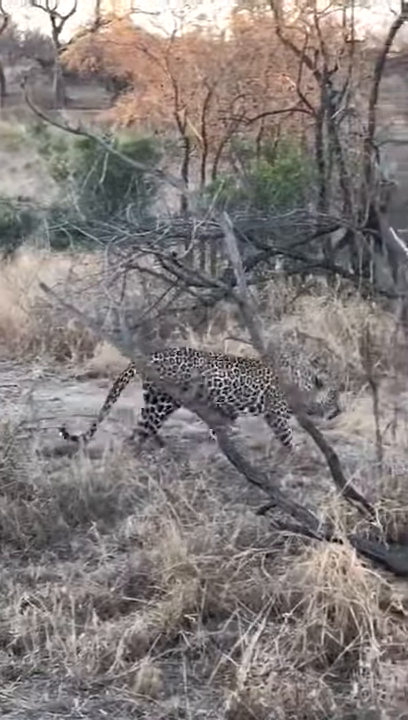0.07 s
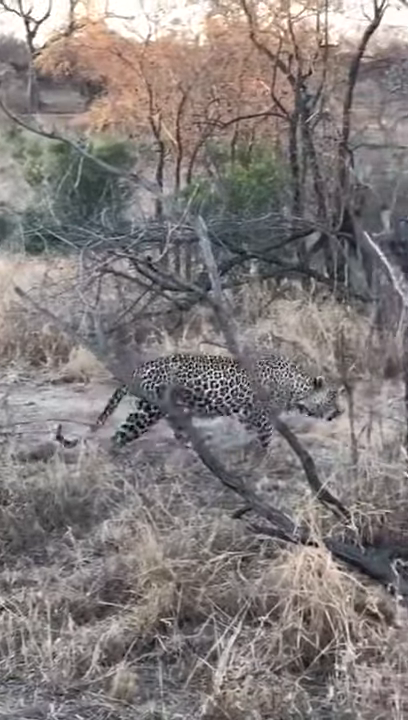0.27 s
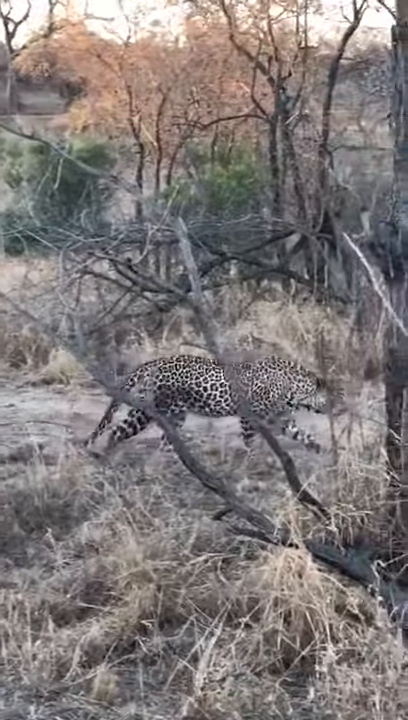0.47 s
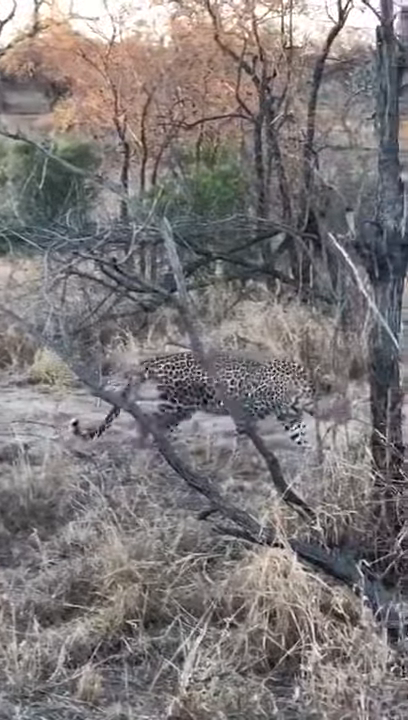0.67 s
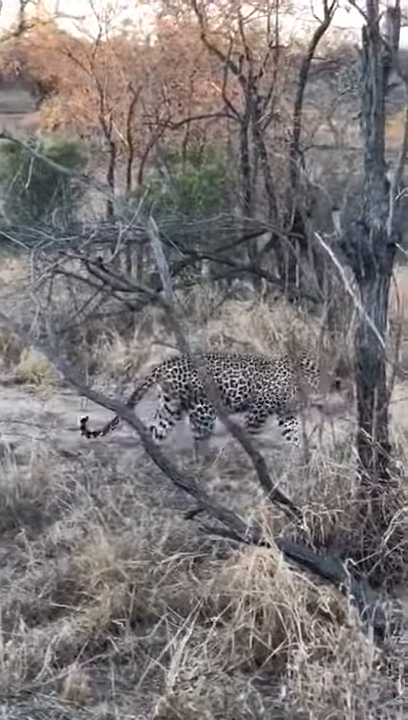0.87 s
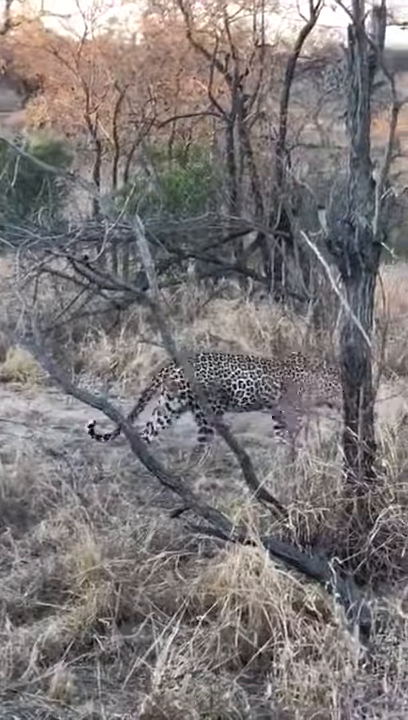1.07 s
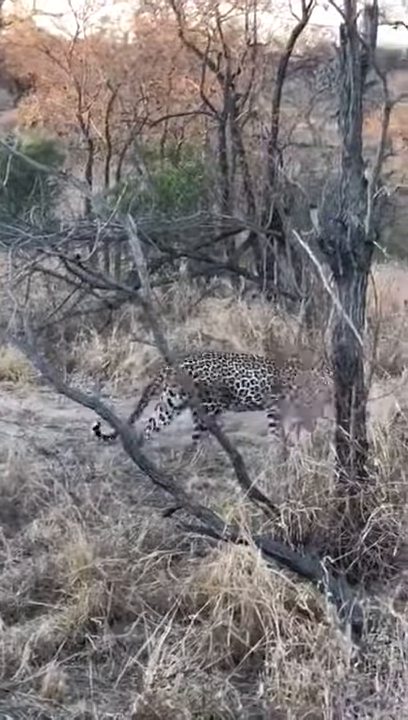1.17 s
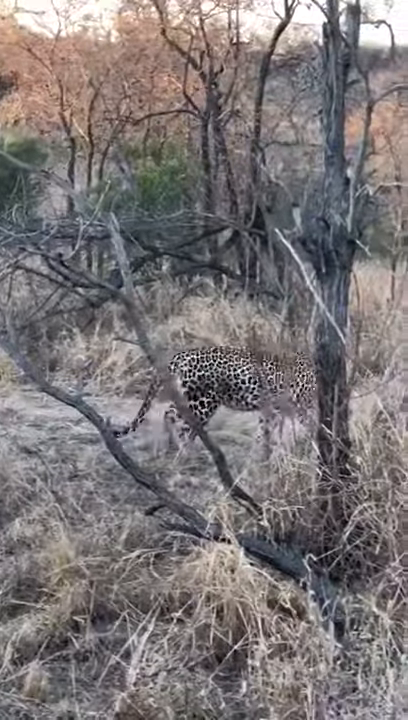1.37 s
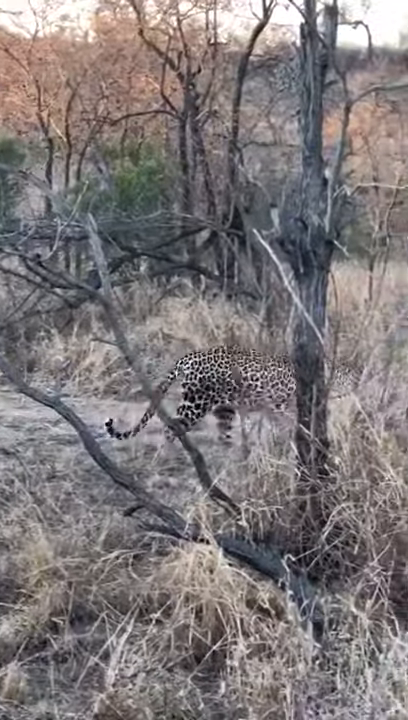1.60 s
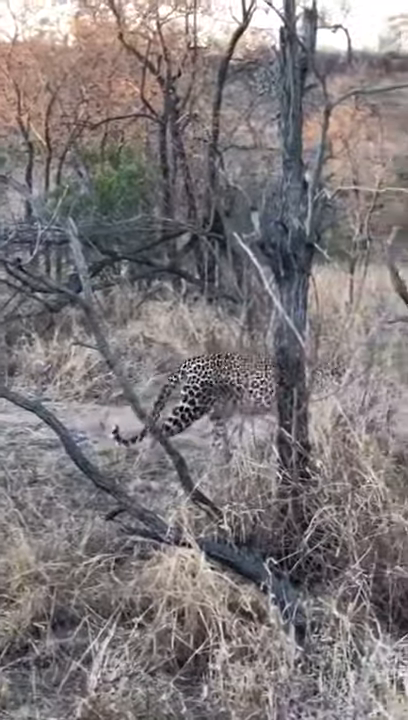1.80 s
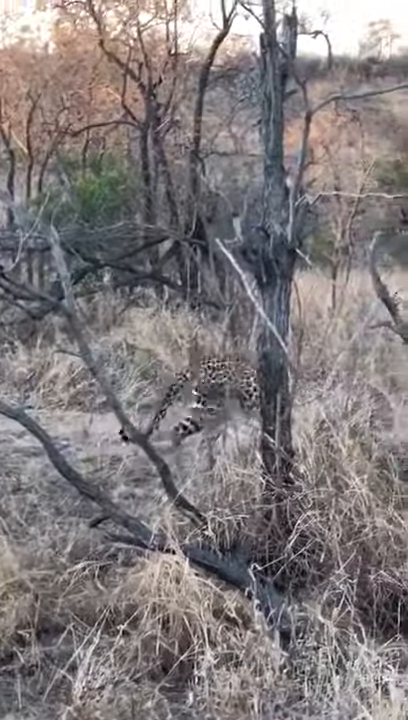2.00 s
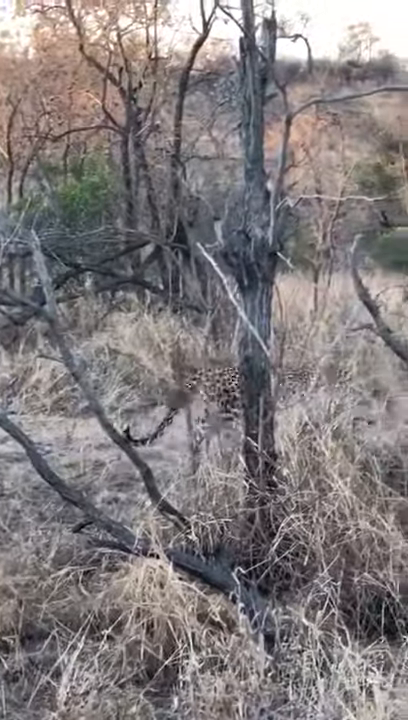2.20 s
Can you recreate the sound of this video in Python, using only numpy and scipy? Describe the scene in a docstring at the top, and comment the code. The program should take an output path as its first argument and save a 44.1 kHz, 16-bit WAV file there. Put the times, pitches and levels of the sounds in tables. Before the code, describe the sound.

A leopard makes a rough sawing call in open bush. Three loud, deep, rattling grunts come at about 0.5, 1.2 and 1.8 seconds, each sinking in pitch, the second a little duller. A quieter hoarse inward rasp precedes each, near 0.3, 0.9 and 1.6 seconds. Soft gulps and wet mouth ticks fall in and between them. A faint distant rumble and thin crackling hiss lie underneath.

```python
"""A leopard saws as it walks through dry bush: three loud outward grunts, each after a hoarse inward rasp.
Its slack vocal folds slap about forty times a second, then slow down; every slap chops a deep, sinking
groan, rings the mouth and lets out a puff of air. Soft gulps and wet mouth ticks come in and between
strokes. Scrub scatters a dull tail, over a faint far rumble and a thin, crackling hiss."""
import sys
import numpy as np
from scipy import signal
from scipy.fft import rfft, irfft
from scipy.io import wavfile
from scipy.ndimage import uniform_filter1d

SR = 44100
rng = np.random.default_rng(int(sys.argv[2]) if len(sys.argv) > 2 else 0)


def store_wav(level_fs):
    """Save 16-bit WAV to argv[1]."""
    pcm = np.round(np.clip(np.atleast_2d(level_fs), -1, 1) * 32767)
    wavfile.write(sys.argv[1], SR, pcm.T.astype(np.int16))


N = 99225
TIME_S = np.arange(N) / SR

# Outward grunts. Each row: time of fastest slapping in seconds, base slap gap in seconds, slowing in
# seconds per slap cubed, groan pitch at that time in Hz, tract frequency scale, treble in dB.
GRUNT_STROKES = [(.4845, .022, .00023, 180.4, 1.0, 1), (1.147, .0226, .00022, 178.3, .98, -12.5),
                 (1.846, .024, .00018, 176.9, 1.025, 0)]
# Push and air flow, one curve per grunt. Each point: time in seconds, relative level in dB.
GRUNT_PUSH = [
    [(.39, -13), (.41, -7), (.455, -9.5), (.492, 3), (.55, -4.5), (.64, -10.5), (.69, -30), (.712, -47)],
    [(1.035, -13.5), (1.075, -6), (1.14, -0.5), (1.21, 0), (1.29, -13), (1.335, -28.5), (1.38, -75)],
    [(1.75, -14), (1.772, -16), (1.835, 0), (1.93, -3.5), (2.0, -14.5), (2.05, -25.5), (2.125, -54)],
]
GRUNT_AIR = [
    [(.385, -37), (.41, -8), (.445, -12.5), (.49, 2.5), (.555, -1.5), (.63, -11), (.72, -35)],
    [(1.03, -16.5), (1.065, -4.5), (1.14, -1), (1.2, 3), (1.25, -4.5), (1.3, -9.5), (1.37, -57)],
    [(1.75, -23), (1.77, -8), (1.82, -1.5), (1.88, -1), (1.95, -5), (2.01, -16.5), (2.11, -51)],
]
# Fold flutter and air flow, one curve per rasp. Each point: time in seconds, relative level in dB.
RASP_FLUTTER = [
    [(0.19, -55), (0.202, -42), (0.22, -28.5), (0.326, -29.5), (0.378, -52), (0.385, -60)],
    [(0.8, -43.5), (0.864, -36), (0.878, -29), (0.94, -29.5), (0.974, -33), (1.03, -59)],
    [(1.505, -79), (1.521, -35.5), (1.617, -30), (1.661, -32.5), (1.727, -50), (1.74, -72)],
]
RASP_AIR = [
    [(0.15, -64.5), (0.21, -46), (0.218, -57), (0.236, -45), (0.246, -49), (0.262, -41.5), (0.336, -51),
     (0.38, -77)],
    [(0.77, -63.5), (0.844, -48), (0.864, -58), (0.884, -45), (0.924, -49), (0.93, -38.5), (0.992, -48),
     (1.03, -94)],
    [(1.47, -67), (1.522, -47), (1.588, -46.5), (1.616, -40), (1.634, -54), (1.642, -42), (1.712, -54.5),
     (1.74, -87)],
]
# Treble shelf of each rasp in dB.
RASP_TREBLE_DB = [4.5, -10, -0.5]
# Throat and mouth resonances. Each row: base frequency in Hz, relative gain in dB, T60 in seconds.
GRUNT_TRACT_MODES = [(562.4, -22, 0.053), (659, -27.5, 0.033), (746, -31, 0.065), (957, -42.5, 0.056),
                     (1175, -36, 0.049), (1308, -41, 0.047), (1482, -36, .035), (1669, -38, 0.071),
                     (1823, -37, 0.023), (1958, -31, 0.038), (2152, -38.5, 0.022), (3307, -46.5, 0.032),
                     (4196, -40.5, .025), (4780, -44, 0.033)]
RASP_THROAT_MODES = [(68, -10, 0.098), (97.2, -5.5, 0.15), (158.1, 5, 0.11), (186, 4, 0.072),
                     (289, -6, 0.085)]
RASP_MOUTH_MODES = [(594, 0.5, 0.16), (864, -2.5, 0.023), (1070, -17.5, 0.034), (1346, -11.5, 0.068),
                    (1824, -4, 0.02), (2070, -4.5, .025), (2341, -3.5, 0.033), (2700, -16, 0.076),
                    (3990, -12, 0.022)]
# Throat catches. Each row: start in seconds, strength in dB, pitch in Hz, T60 in seconds.
THROAT_GULPS = [(.001, -27, 168, .11), (.126, -31, 174.4, 0.22), (.203, -28.5, 307, 0.032),
                (0.407, -21, 380, 0.03), (0.439, -17, 279, 0.051), (0.443, -30, 180, 0.093),
                (0.783, -32.5, 175.3, 0.21), (.834, -25.5, 227, 0.033), (1.044, -35.5, 152, 0.14),
                (1.453, -27, 177, 0.12), (2.185, -27.5, 183.7, 0.14)]
# Wet ticks. Each row: start in seconds, strength in dB, centre in Hz, decay in seconds.
MOUTH_TICKS = [(0.413, -44.5, 4600, 0.011), (0.26, -51, 7600, 0.011), (0.835, -52, 2420, 0.0089),
               (1.518, -47, 3300, 0.0029), (1.538, -57, 9100, 0.032), (2.178, -56.5, 2540, 0.0062),
               (2.203, -54, 3540, 0.0013)]
# Breath and far rumble spectra. Each row: frequency in Hz, relative density in dB.
GRUNT_SPECTRUM = [(150, -31), (300, 19.5), (430, -13), (600, 12), (780, -11), (1050, -9), (1300, -12.5),
                  (1650, -10.5), (2000, -14.5), (2400, -11), (2900, -27.5), (3400, -20), (4600, -18.5),
                  (6200, -20.5), (8000, -25), (11500, -33)]
RASP_SPECTRUM = [(200, 15.5), (430, 6.5), (600, -5), (850, -2.5), (1080, -10.5), (1450, 2), (1900, 7.5),
                 (2350, -7.5), (3000, -11), (4200, -7), (6000, -11), (8000, -18.5), (11500, -42)]
RUMBLE_SPECTRUM = [(25, -20.5), (55, -0.5), (110, 17.5), (180, 11.5), (350, -2.5), (620, -1.5), (1100, -9),
                   (2000, -15), (4000, -19), (11000, -71)]
# Background hiss. Each row: time in seconds, relative level in dB.
HISS_CURVE = [(0, -62), (.22, -64.5), (0.371, -76.5), (.5, -63.5), (.75, -67.5), (1.001, -72), (1.4, -75.5),
              (1.71, -74), (2.25, -76.5)]


def grunts(groan_db=-11, thump_db=-21, slap_db=-8, spread_db=3, breath_db=-30.5, hiss_db=-31.5):
    """Fold slaps peak in rate, then drag as the grunt dies; each thumps, rings the mouth and puffs."""
    out, slap_index = np.zeros(N), np.arange(-3, 8)
    hiss, white = noise(GRUNT_SPECTRUM), rng.standard_normal(N)
    for stroke, push, air in zip(GRUNT_STROKES, GRUNT_PUSH, GRUNT_AIR):
        peak_s, gap_s, slowing_s, pitch_hz, tract_scale, treble_db = stroke
        slaps_s = peak_s + gap_s * slap_index + slowing_s * slap_index ** 3
        tone, phase = groan(slaps_s, peak_s, pitch_hz)
        thumps = thump(slaps_s, from_db(thump_db) * level(push, slaps_s) ** 0.25, hz=158.8, t60_s=0.066)
        opening = 0.36 + puffs(slaps_s - 0.00078, decay_s=0.0049)  # steady leak plus puffs
        flow = level(air) * (1 + 0.22 * np.cos(phase)) * opening
        sizes = level(air, slaps_s) * from_db(slap_db + spread_db * rng.standard_normal(len(slaps_s)))
        drive = clicks(slaps_s, sizes) + from_db(breath_db) * white * flow
        mouth = resonate(drive, GRUNT_TRACT_MODES, tract_scale) + from_db(hiss_db) * hiss * flow
        mouth += knocks(white, slaps_s[slap_index > 0]) * level(air)
        out += from_db(groan_db) * level(push) * tone + thumps + brighten(mouth, treble_db)
    return out


def groan(slaps_s, peak_s, pitch_hz, sag_hz_per_s=140, deepening_per_s=3.5, width_cycles=0.19):
    """Sinking tone and its phase; each slap chokes it, most deeply where slaps are slow."""
    age_s = TIME_S - peak_s
    phase = 2 * np.pi * (pitch_hz * age_s - 0.5 * sag_hz_per_s * age_s ** 2)
    cycles = np.interp(TIME_S, slaps_s, np.arange(len(slaps_s)))
    closure = np.exp(-((cycles - np.round(cycles)) / width_cycles) ** 2)
    depth = np.clip(0.59 + deepening_per_s * np.abs(age_s), 0, 1)
    return (1 - depth * closure) * np.sin(phase), phase


def thump(times_s, sizes, hz, t60_s):
    """Soft blows on the deep throat resonance."""
    return cut(ring(clicks(times_s, sizes), hz, t60_s), [69, 350], "band")


def puffs(times_s, decay_s):
    """Flow envelope: air bursts out at each slap and dies away."""
    decays = signal.lfilter([1], [1, -np.exp(-1 / (decay_s * SR))], clicks(times_s, 0.76))
    return cut(decays, 280, "low", order=1)


def knocks(white, slaps_s, gain_db=-33, low_hz=1138, high_hz=2120):
    """Dragging slaps knock harder: a midrange noise burst each."""
    bursts = cut(white * puffs(slaps_s, decay_s=0.0048), [low_hz, high_hz], "band", order=4)
    return from_db(gain_db) * bursts / np.sqrt(2 * (high_hz - low_hz) / SR)


def rasps(slaps_per_s=62, jitter=0.25, leak=0.24, flutter_db=1.5, hiss_db=-3.5, mouth_db=-2.5):
    """Indrawn air flutters the folds unevenly and rushes through the hollow mouth."""
    slaps_s = np.cumsum(np.exp(jitter * rng.standard_normal(300)) / slaps_per_s)
    slaps_s = slaps_s[slaps_s < TIME_S[-1]]
    flutter = cut(resonate(clicks(slaps_s, 0.8), RASP_THROAT_MODES), [55, 400], "band")
    flutter /= np.sqrt(uniform_filter1d(flutter ** 2, size=1500) + 1e-6)  # even out the level
    flow = unit_rms(leak + puffs(slaps_s, decay_s=0.0069))
    mouth = unit_rms(cut(resonate(rng.standard_normal(N) * flow, RASP_MOUTH_MODES), 520, "high"))
    rush = from_db(hiss_db) * noise(RASP_SPECTRUM) * flow + from_db(mouth_db) * mouth
    out = np.zeros(N)
    for folds, air, treble_db in zip(RASP_FLUTTER, RASP_AIR, RASP_TREBLE_DB):
        out += from_db(flutter_db) * flutter * level(folds) + brighten(rush, treble_db) * level(air)
    return out


def gulps():
    """Single soft slaps as the throat opens or catches."""
    return sum(thump([start_s], from_db(db), hz, t60_s) for start_s, db, hz, t60_s in THROAT_GULPS)


def ticks(edge_ratio=1.13):
    """Short wet bursts from the mouth."""
    out = np.zeros(N)
    for start_s, db, hz, decay_s in MOUTH_TICKS:
        band = unit_rms(cut(rng.standard_normal(N), [hz / edge_ratio, hz * edge_ratio], "band"))
        out += from_db(db) * band * puffs([start_s], decay_s)
    return out


def scatter(voice, gain_db=-26, t60_s=0.2, cutoff_hz=2700, delay_s=0.008):
    """Trunks and scrub return a faint, dull tail."""
    tail = cut(rng.standard_normal(N), cutoff_hz, "low", order=1)
    tail *= from_db(-60 * TIME_S / t60_s) * (TIME_S > delay_s)
    tail *= np.sqrt(SR / (np.pi * cutoff_hz) / np.sum(tail ** 2))  # near unit passband gain
    return from_db(gain_db) * signal.fftconvolve(voice, tail)[:N]


def background(rumble_db=-54.5, hiss_db=-2, crackle_db=-7.5, spread_db=7, crackles_per_s=65, decay_s=0.0011):
    """Far rumble and a thin hiss with a faint dry crackle."""
    sizes = from_db(spread_db * np.minimum(rng.exponential(1, N), 3))
    impulses = sizes * (rng.random(N) < crackles_per_s / SR) + 1e-18
    crackle = unit_rms(signal.lfilter([1], [1, -np.exp(-1 / (decay_s * SR))], impulses))
    hiss = unit_rms(cut(rng.standard_normal(N), [2500, 12000], "band"))
    hiss *= from_db(hiss_db) + from_db(crackle_db) * crackle
    return from_db(rumble_db) * noise(RUMBLE_SPECTRUM) + level(HISS_CURVE) * hiss


def from_db(db):
    """Decibels to gain."""
    return 10 ** (np.asarray(db) / 20)


def unit_rms(x):
    """Scale to unit RMS."""
    return x / np.sqrt(np.mean(x ** 2) + 1e-20)


def level(curve, at_s=TIME_S):
    """Gain along a dB curve, silent outside it."""
    times_s, db = np.transpose(curve)
    return from_db(np.interp(at_s, times_s, db, left=-150, right=-150))


def cut(x, hz, kind, order=2):
    """Butterworth filter."""
    return signal.sosfilt(signal.butter(order, hz, kind, fs=SR, output="sos"), x)


def brighten(x, db, corner_hz=3000):
    """Treble shelf."""
    return x + (from_db(db) - 1) * cut(x, corner_hz, "high", order=1)


def noise(spectrum):
    """Unit-RMS coloured noise, rolled off below the first point."""
    hz, db = np.transpose(spectrum)
    bins_hz = np.maximum(np.fft.rfftfreq(N, 1 / SR), 1)
    gain = from_db(np.interp(np.log(bins_hz), np.log(hz), db)) * np.minimum(bins_hz / hz[0], 1) ** 2
    return unit_rms(irfft(rfft(rng.standard_normal(N)) * gain, N))


def clicks(times_s, sizes):
    """An impulse at each time."""
    out = np.zeros(N) + 1e-18
    np.add.at(out, np.clip(np.asarray(times_s) * SR, 0, N - 1).astype(int), sizes)
    return out


def ring(x, hz, t60_s):
    """Resonator: a unit click starts a decaying unit sine."""
    radius, step_rad = from_db(-60 / (t60_s * SR)), 2 * np.pi * hz / SR
    return signal.lfilter([0, np.sin(step_rad)], [1, -2 * radius * np.cos(step_rad), radius ** 2], x)


def resonate(x, modes, scale=1):
    """Parallel resonators with alternating signs."""
    return sum((-1) ** i * from_db(db) * ring(x, hz * scale, t60_s)
               for i, (hz, db, t60_s) in enumerate(modes))


def scene():
    """The leopard in open bush, mono."""
    voice = grunts() + rasps() + gulps() + ticks()
    return (voice + scatter(voice) + background())[None]


def record(dry, low_hz=38, high_hz=11700):
    """The microphone loses the deepest bass; the top is cut steeply."""
    lowpass = signal.ellip(10, 0.2, 80, high_hz, fs=SR, output="sos")
    return signal.sosfilt(lowpass, cut(dry, low_hz, "high", order=3))


dry = scene()
out = record(dry)
store_wav(out)
```